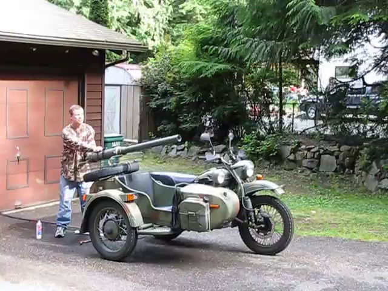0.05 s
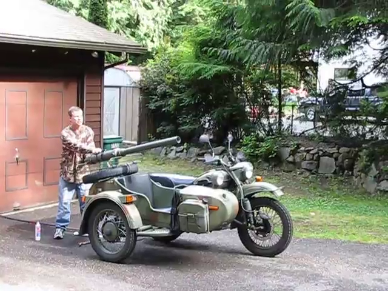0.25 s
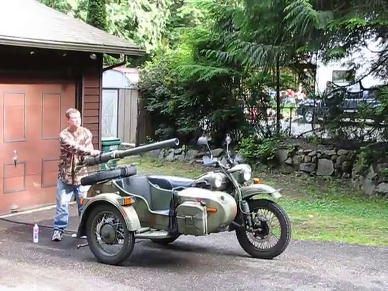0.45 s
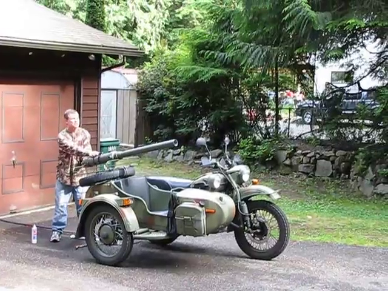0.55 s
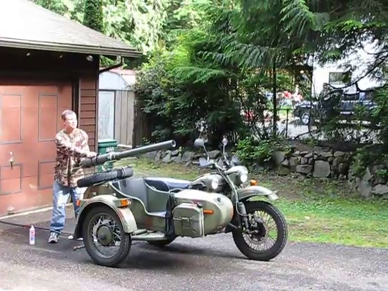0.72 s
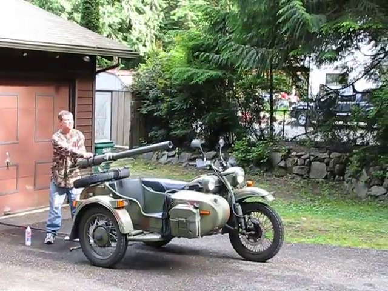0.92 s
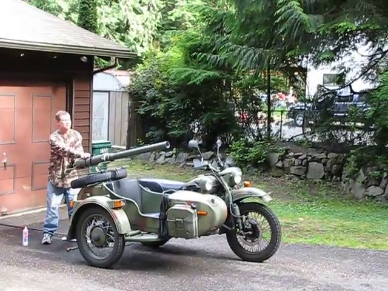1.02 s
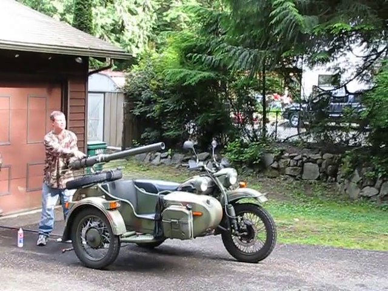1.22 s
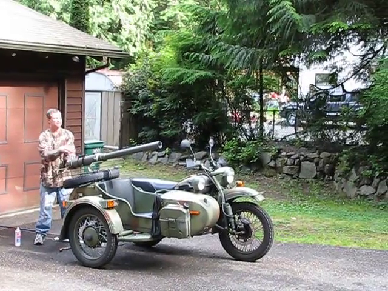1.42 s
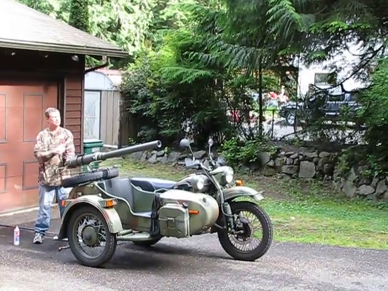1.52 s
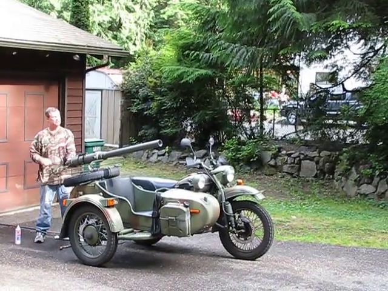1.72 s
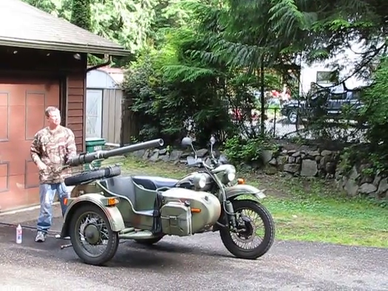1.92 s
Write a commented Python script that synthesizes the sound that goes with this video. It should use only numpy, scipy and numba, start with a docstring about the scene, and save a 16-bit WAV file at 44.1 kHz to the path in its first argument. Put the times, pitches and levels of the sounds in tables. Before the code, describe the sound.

A homemade cannon fires one loud bang that echoes away across a yard.

```python
"""A light knock and a few igniter clicks over faint yard air: a homemade ball cannon is about to fire,
a few metres from the camera microphone. The charge fizzes, air rushes ahead of the ball, and one ringing
blast slaps off the garage and rolls away through the trees and far houses.
The shot overloads the camera, whose gain ducks and creeps back; hands rustle on the cannon in the tail."""
import sys
import numpy as np
from scipy import signal
from scipy.fft import rfft, irfft, next_fast_len
from scipy.io import wavfile
from numba import njit

SR = 44100
rng = np.random.default_rng(int(sys.argv[2]) if len(sys.argv) > 2 else 0)


def dump(signal):
    """Clip the signal to [-1, 1] and save it as 16-bit WAV at the path in sys.argv[1]."""
    limited = np.clip(np.atleast_2d(signal).T, -1, 1)
    pcm = np.round(limited * 32767).astype(np.int16)
    wavfile.write(sys.argv[1], SR, pcm)


N = 85995
FIRE_S = 0.2136

# stereo width of diffuse sound at the microphone (frequency [Hz], side minus mid [dB])
WIDTH = [(60, -28.5), (200, -21.5), (700, -12.5), (1300, -8), (2400, -2), (4400, -0.5)]
# open air in the yard (frequency [Hz], octave level [dB])
AIR = [(30, -50), (70, -52), (120, -46), (175, -54.5), (260, -45), (400, -56.5), (800, -52.5), (2800, -53),
       (4500, -57.5), (8000, -60), (15000, -69.5)]
# faint drone in the distance (frequency [Hz], level [dB])
DRONE = [(119, -46), (264, -48.5)]
# hands rustling on the cannon (peak time [s], half-length [s], level [dB])
RUSTLES = [(1.34, 0.064, -46.5), (1.798, 0.083, -58)]
# spectrum of the rustles (frequency [Hz], relative octave level [dB])
RUSTLE_COLOUR = [(1500, -2), (3500, 0), (5200, -7), (6800, -5), (9000, -13.5), (15000, -12)]
# thin squeaks of the handled barrel (peak time [s], half-length [s], level [dB])
SQUEAKS = [(1.78, 0.065, -58), (1.868, 0.0063, -54)]
# igniter and handling clicks (time [s], level [dB], t60 [s])
CLICKS = [(0.0641, -30, 0.011), (0.0754, -42, 0.013), (0.084, -49, 0.063), (0.1409, -40, 0.022),
          (1.532, -45.5, 0.078)]
# spectrum of the clicks (frequency [Hz], relative octave level [dB])
CLICK_COLOUR = [(1000, -18.5), (3000, -9), (4600, 0), (5800, -2), (8000, -1.5), (11000, -28), (16000, -15)]
# spectrum of the fizzing charge and the hiss around the bang (frequency [Hz], relative octave level [dB])
FIZZ_COLOUR = [(2000, -26), (3700, -23.5), (4700, -4.5), (8000, 0.5), (11000, -11), (16000, -8.5)]
# distant roll from the woods and far houses (frequency [Hz], octave level [dB], t60 [s])
WOODS = [(35, -26.5, 3.2), (62, -17.5, 2.6), (110, -45.5, 2.1), (173, -49, 9.6), (350, -22, 4.39),
         (750, -14.5, 3.345), (1410, -13.5, 2.96), (2700, -12.5, 2.194), (5351, -13, 1.486),
         (8760, -12.5, 0.83), (15000, -18, 0.59)]
# scatter around the yard (frequency [Hz], relative octave level [dB], t60 [s])
YARD = [(35, -12, 0.41), (65, -20.5, .75), (150, -19.5, 0.23), (300, -1.5, 0.64), (700, -1, .66),
        (1400, 1.5, 0.63), (2770, 1.5, 0.69), (5600, 0.5, 0.43), (13000, -15, .47)]
# dense slap off the garage, fence and stone wall (frequency [Hz], octave level [dB], t60 [s])
SLAP = [(40, -6, 0.41), (250, -6.5, 0.55), (700, 5.5, 0.16), (2000, -2.5, 0.25), (4870, 0.5, 0.26),
        (14000, -6, 0.12)]
# hard reflections off nearby walls (delay [s], relative level [dB])
WALLS = [(.0044, -5.5), (0.028, -20.5), (.047, -24)]
# short ringing tones that colour the bang (frequency [Hz], level [dB], t60 [s])
BLAST_TONES = [(62.3, 4, 0.17), (568, 19, 0.032), (241.8, -9, .2), (310, 5.5, 0.1), (1809, -5.5, 0.062),
               (3032, -13, .45), (3572, -17.5, .25), (5144, -4.5, 0.073), (5356, -16.5, .4)]
# tone of the camera's audio stage (frequency [Hz], gain [dB])
CAMERA_TONE = [(30, 5.5), (62, 2.5), (100, 3), (150, 0.5), (215, -4.5), (330, -1), (410, -3.5), (520, 0.5),
               (1000, -0.5), (2500, 2.5), (6000, 0.5), (11000, 2), (16000, -2)]


def undb(db):
    """Decibels to gain."""
    return 10 ** (np.asarray(db) / 20)


def since(start):
    """Seconds since a moment, zero before it."""
    return np.maximum(np.arange(N) / SR - start, 0)


def fade(start, t60):
    """Sudden start, then a fall of 60 dB every t60 seconds."""
    t = since(start)
    return (t > 0) * np.exp(-np.log(1000) * t / t60)


def swells(table):
    """Rounded swells of level."""
    return sum(undb(db) * np.exp(-((since(0) - peak) / half) ** 2) for peak, half, db in table)


def lookup(hz, table, column=1):
    """Read a column of a table on a log-frequency axis."""
    table = np.array(table, float)
    return np.interp(np.log(np.maximum(hz, 1)), np.log(table[:, 0]), table[:, column])


def wander(turns_per_s):
    """Smooth random wander with a spread near 1."""
    return np.interp(since(0) * turns_per_s, np.arange(512), rng.standard_normal(512))


def bands():
    """Half-octave stereo noises, scaled to unit power per octave; wide treble, narrow bass."""
    size = next_fast_len(N, True)
    hz = np.maximum(np.arange(size // 2 + 1) * SR / size, 1)
    mid, side = rfft(rng.standard_normal((2, size)))
    width = undb(lookup(hz, WIDTH))
    stereo = mid + np.array([[1], [-1]]) * width * side
    pink = stereo * np.sqrt(SR / (2 * np.log(2) * hz * (1 + width ** 2)))
    for centre in 31 * 2 ** (np.arange(19) / 2):
        window = np.maximum(1 - 2 * abs(np.log2(hz / centre)), 0)
        yield centre, irfft(pink * window, size)[:, :N]


def resonant_noise(hz, width_hz):
    """Unit noise in one resonance, with dark treble."""
    x = signal.lfilter(*signal.iirpeak(hz, hz / width_hz, fs=SR), rng.standard_normal(N))
    x = signal.sosfilt(signal.butter(2, 2 * hz, fs=SR, output="sos"), x)
    return x / x.std()


def colour(x, table, size=2048):
    """Minimum-phase filter through (frequency [Hz], gain [dB]) points."""
    hz = np.arange(size + 1) * SR / (2 * size)
    cepstrum = irfft(np.log(undb(lookup(hz, table))))[:size]
    response = irfft(np.exp(rfft(2 * cepstrum, 2 * size) - cepstrum[0]))[:size]
    return signal.fftconvolve(x, response[None], axes=1)[:, :N]


@njit
def follow(x, threshold, attack, hold, release):
    """Level follower: rises with the sound, waits, then sinks steadily to its threshold."""
    out, level, wait = np.empty(len(x)), 0., 0.
    for i in range(len(x)):
        wait -= 1
        if x[i] > level:
            level += (x[i] - level) * attack
            wait = hold
        elif wait < 0:
            level *= release
        out[i] = max(level, threshold)
    return out


def duck(x, threshold, attack_s, lag_s, hold_s=0.55, release_db_per_s=9):
    """The camera senses a loud level a little late, turns both channels down, then creeps back."""
    sensed = np.interp(since(0) - lag_s, since(0), abs(x).max(axis=0))
    release = float(undb(-release_db_per_s / SR))
    return x * threshold / follow(sensed, threshold, 1 / (attack_s * SR), hold_s * SR, release)


def outdoors():
    """The bed of the yard: distant rumble and drone and leafy hiss, wavering a little."""
    drone = sum(undb(db + 1.5 * wander(12)) * np.sin(2 * np.pi * hz * since(0) + 0.8 * wander(14))
                for hz, db in DRONE)
    return drone + sum(noise * undb(lookup(hz, AIR) - 0.6 * wander(8)) for hz, noise in bands())


def handling():
    """At the cannon: a knock on the breech before the shot, uneven rubs and thin squeaks after it."""
    knock = undb(-38.5) * fade(0.0138, t60=0.021) * resonant_noise(1600, width_hz=990)
    rubbing = swells(RUSTLES) * undb(4.6 * wander(72))
    rustle = rubbing * sum(noise * undb(lookup(hz, RUSTLE_COLOUR)) for hz, noise in bands())
    squeaks = swells(SQUEAKS) * resonant_noise(5150, width_hz=650)
    return knock + rustle + squeaks


def igniter():
    """Dry clicks of the trigger and hands, and the fizz of the charge catching."""
    clicks = sum(undb(db) * fade(start, t60) for start, db, t60 in CLICKS)
    fizz = undb(-35) * fade(0.1402, t60=0.13)
    return sum(noise * (clicks * undb(lookup(hz, CLICK_COLOUR)) + fizz * undb(lookup(hz, FIZZ_COLOUR)))
               for hz, noise in bands())


def rush():
    """Air whooshes out ahead of the ball and a turbulent jet follows it."""
    from_shot_s = abs(since(0) - FIRE_S)
    air = undb(-15) * resonant_noise(1000, width_hz=770) * np.exp(-from_shot_s / 0.0052)
    # a faint treble hiss swells just before the bang and fades after it
    pre_hiss = undb(-37) * np.exp(-from_shot_s / 0.029)
    jet = undb(-9) * fade(FIRE_S, t60=0.04)
    return air + sum(noise * (pre_hiss * undb(lookup(hz, FIZZ_COLOUR)) + jet * (hz > 1000))
                     for hz, noise in bands())


def scatter(start, table, build_s, clumps_per_s, clump_db, tilt_db_per_octave=0):
    """Countless echoes reach the microphone in clumps; each band dies away at its own rate."""
    clumps = undb(clump_db * wander(clumps_per_s))
    build = 1 - np.exp(-since(start) / build_s)
    tail = 0
    for hz, noise in bands():
        db = lookup(hz, table) + tilt_db_per_octave * max(np.log2(hz / 1000), 0)
        tail += noise * undb(db) * fade(start, t60=lookup(hz, table, column=2))
    return clumps * build * tail


def blast(start, push_s=0.0012):
    """The shot from a few metres: a pressure front with its suction, and short ringing tones."""
    t = since(start)
    front = undb(18) * (t > 0) * (1 - t / push_s) * np.exp(-t / push_s)
    ring = sum(undb(db) * fade(start, t60) * np.sin(2 * np.pi * hz * t) for hz, db, t60 in BLAST_TONES)
    return -(front + ring)


def scene():
    """At the microphone: the shot, its reflections and its near and far tails over the yard air."""
    bang = blast(FIRE_S) + sum(undb(db) * blast(FIRE_S + delay) for delay, db in WALLS)
    slap = scatter(FIRE_S, SLAP, build_s=0.023, clumps_per_s=200, clump_db=2.5)
    yard = undb(-3) * scatter(FIRE_S, YARD, build_s=0.0044, clumps_per_s=110, clump_db=3)
    # a house across the yard returns the scatter, dulled by the longer path
    house = undb(-12.5) * scatter(FIRE_S + 0.163, YARD, build_s=0.0044, clumps_per_s=280,
                                  clump_db=3.5, tilt_db_per_octave=-5.5)
    woods = scatter(FIRE_S, WOODS, build_s=0.039, clumps_per_s=70, clump_db=1.3)
    return igniter() + rush() + bang + slap + yard + house + woods + handling() + outdoors()


def record(dry):
    """The camera's input clips; a quick limiter and a slow gain rider duck it; the top is cut."""
    low_cut = signal.butter(1, 48, "high", fs=SR, output="sos")
    top_cut = signal.ellip(10, 0.2, 70, 15900, fs=SR, output="sos")
    overloaded = signal.sosfilt(low_cut, np.clip(dry, -0.88, 0.88))
    limited = duck(overloaded, threshold=0.43, attack_s=0.0014, lag_s=0.004)
    ridden = duck(limited, threshold=0.045, attack_s=0.19, lag_s=0.037)
    return signal.sosfilt(top_cut, np.clip(colour(ridden, CAMERA_TONE), -1, 1))


dry = scene()
out = record(dry)
dump(out)
```